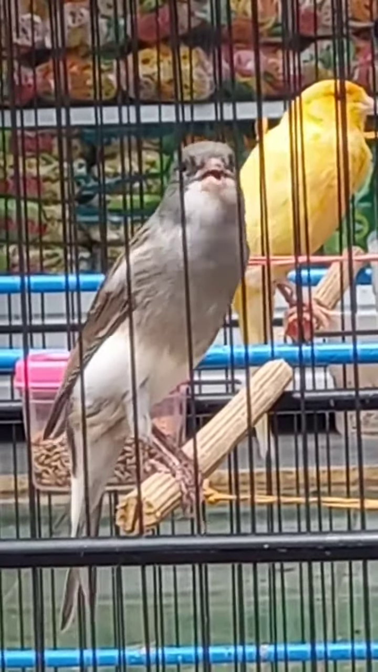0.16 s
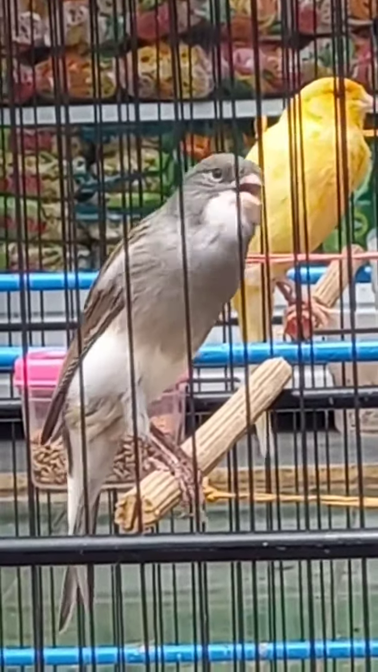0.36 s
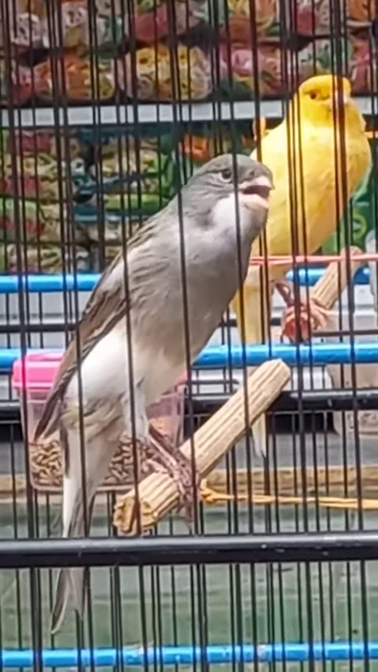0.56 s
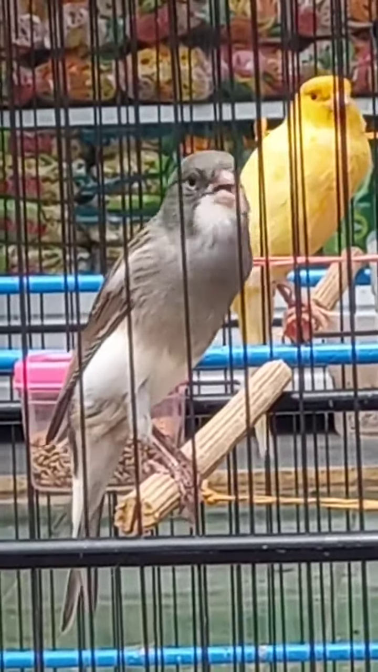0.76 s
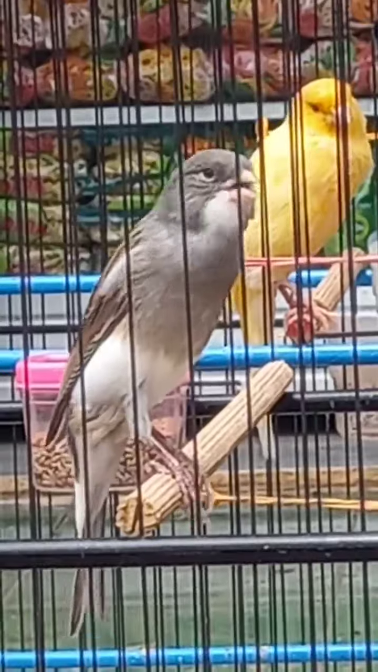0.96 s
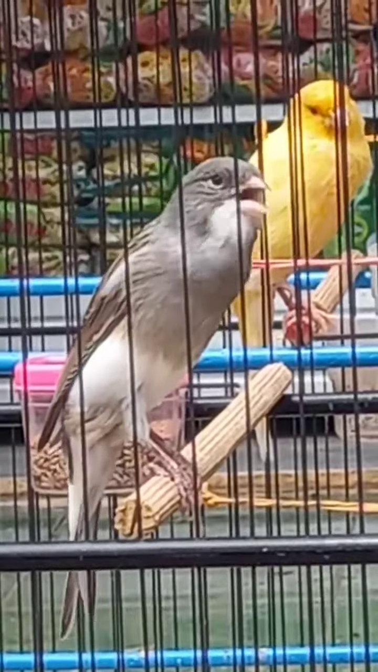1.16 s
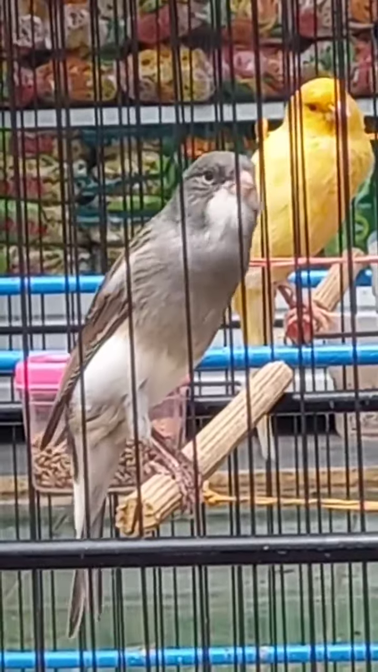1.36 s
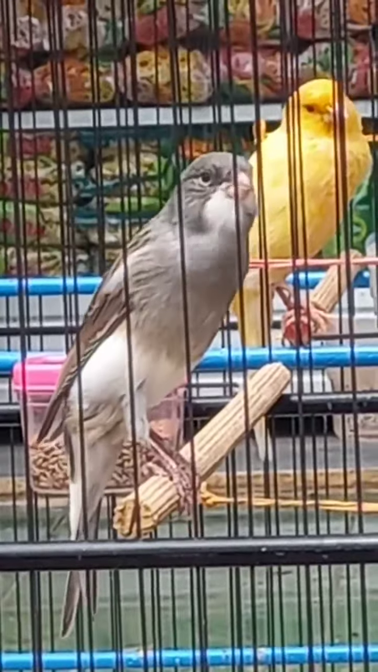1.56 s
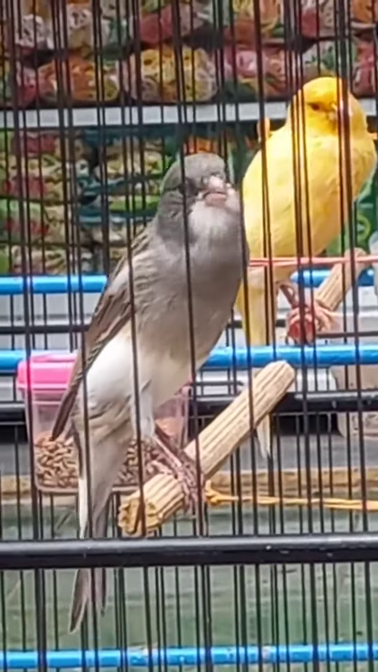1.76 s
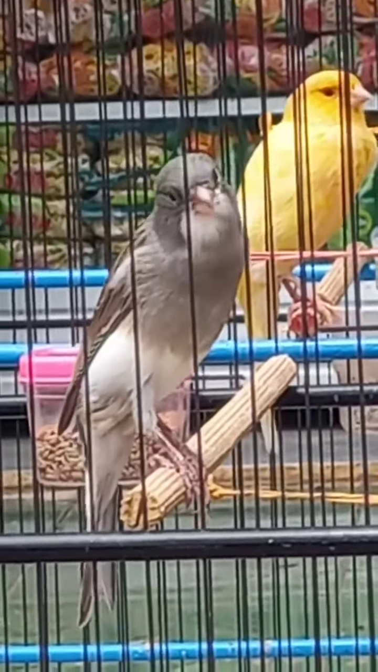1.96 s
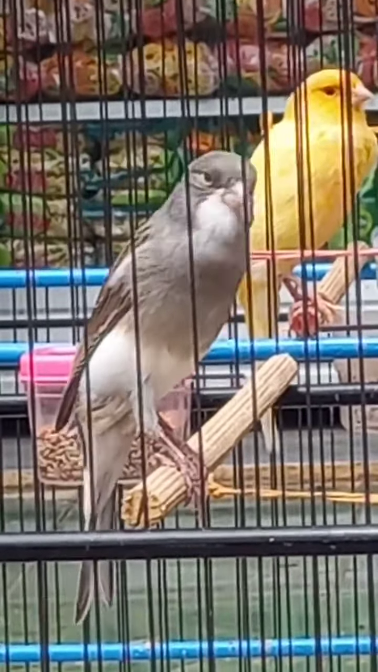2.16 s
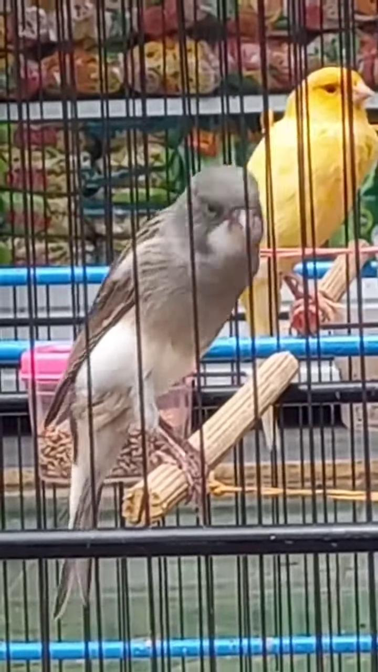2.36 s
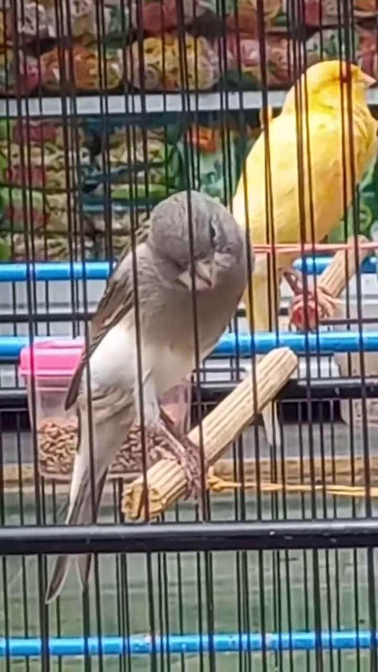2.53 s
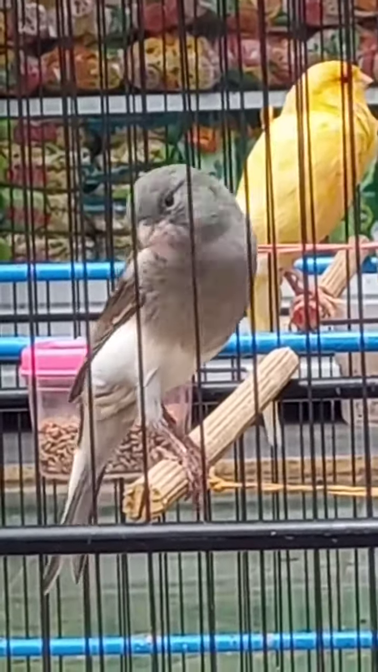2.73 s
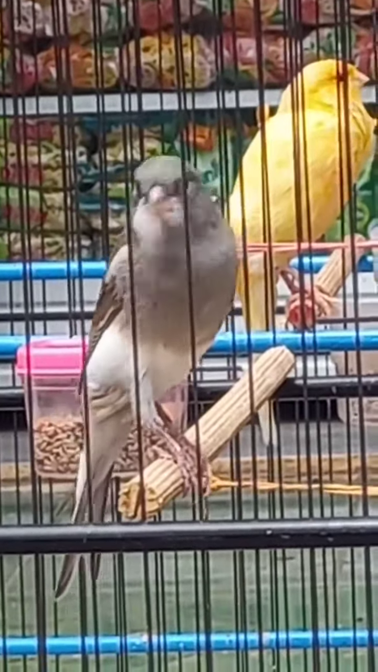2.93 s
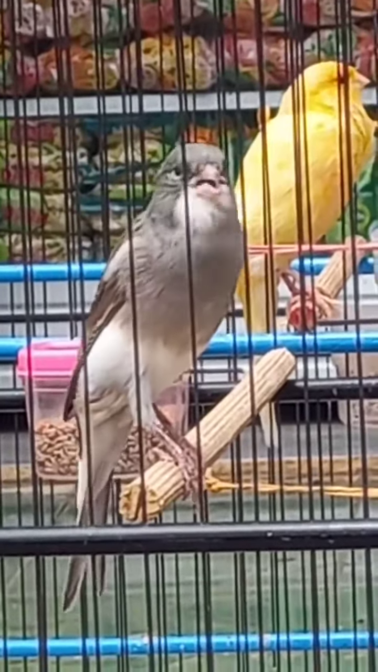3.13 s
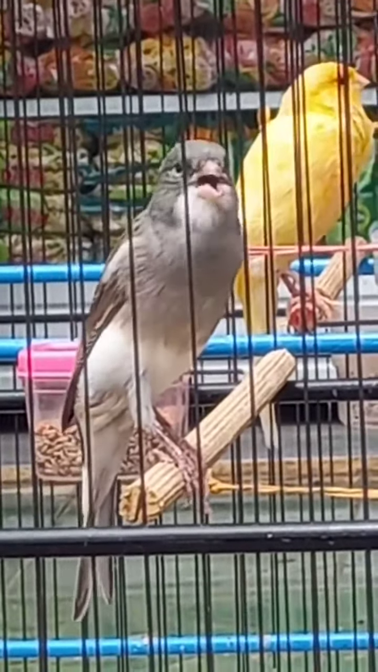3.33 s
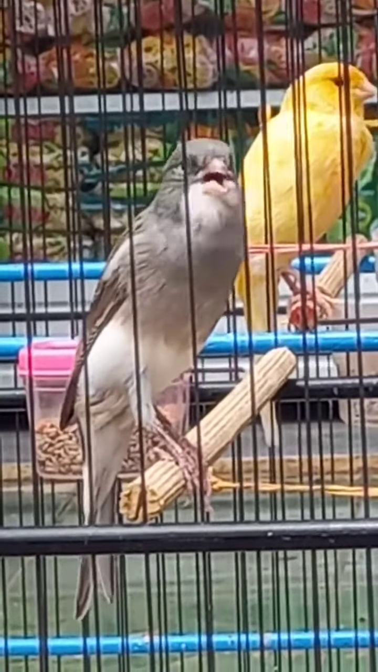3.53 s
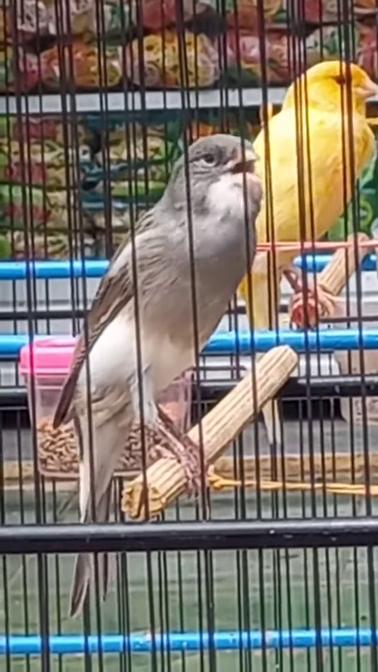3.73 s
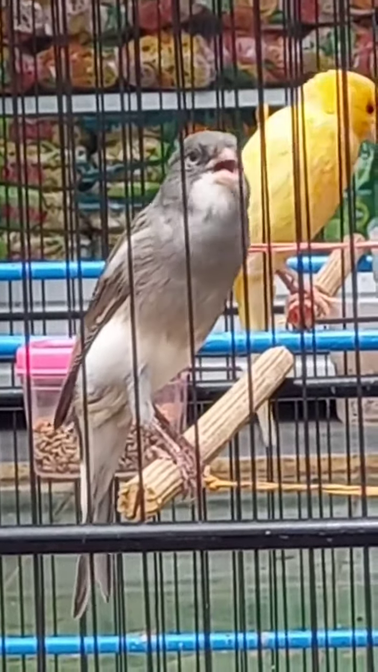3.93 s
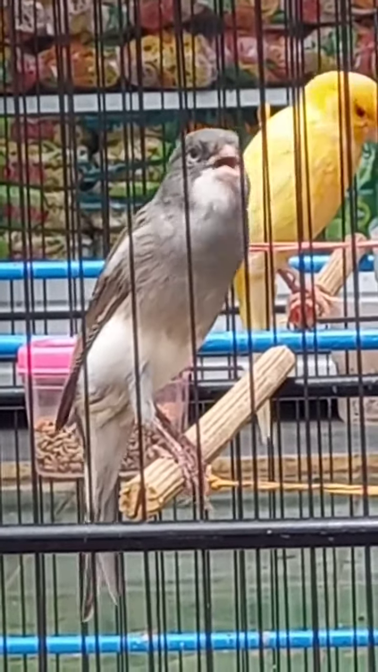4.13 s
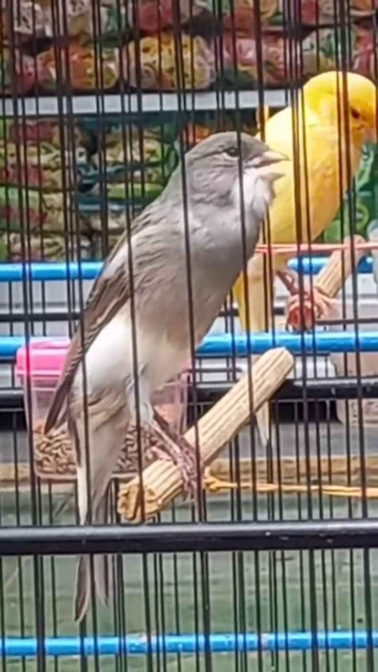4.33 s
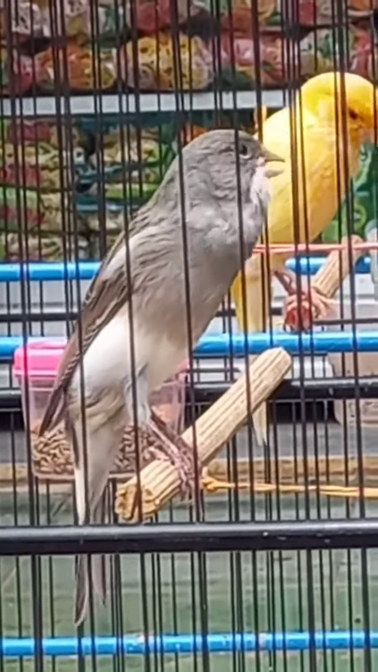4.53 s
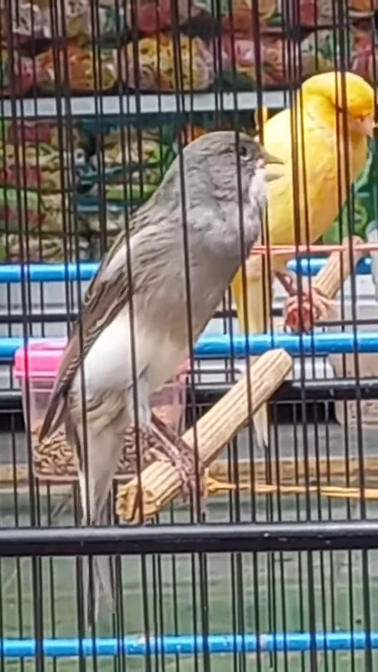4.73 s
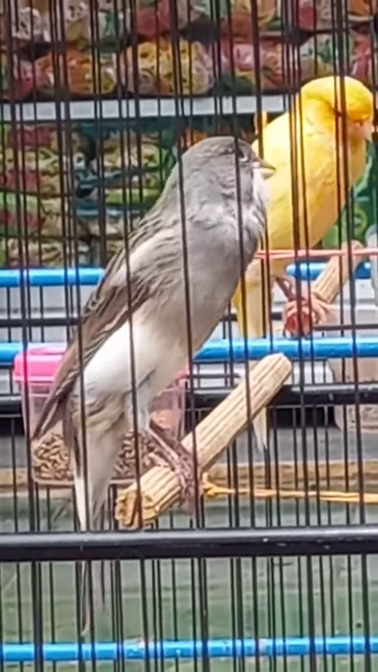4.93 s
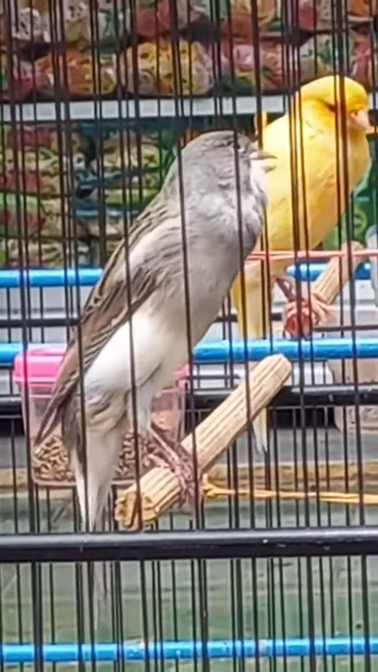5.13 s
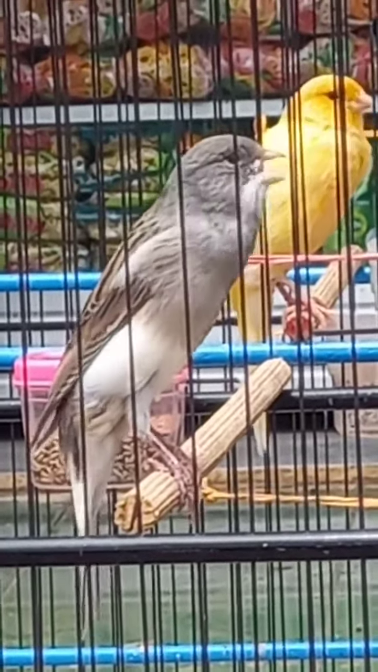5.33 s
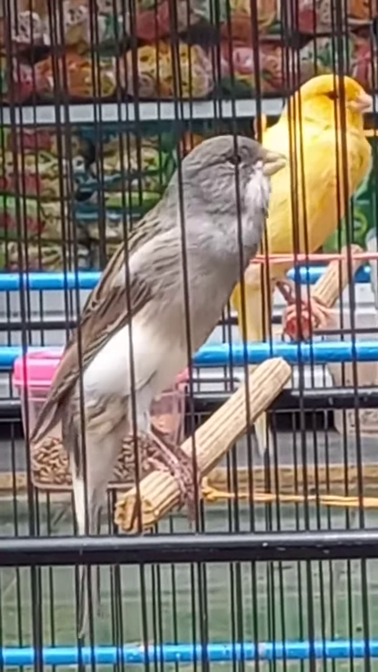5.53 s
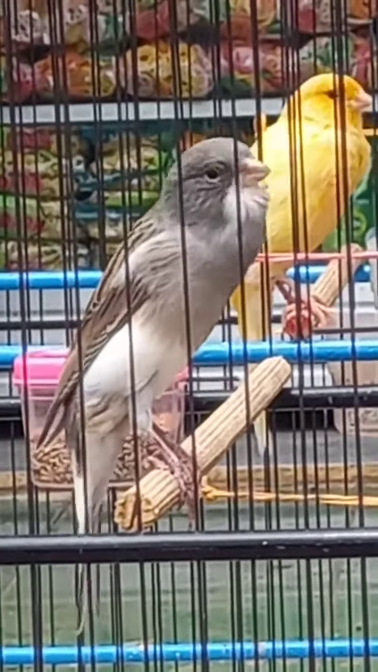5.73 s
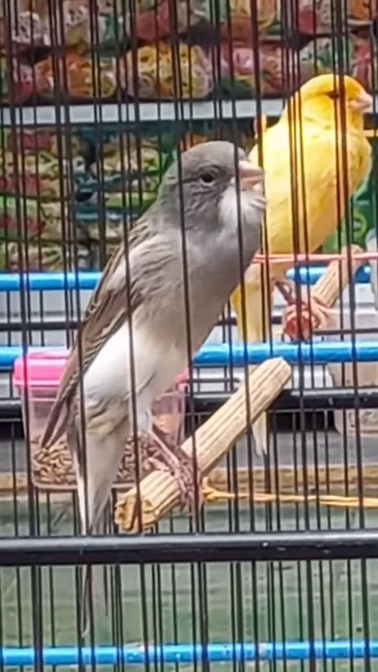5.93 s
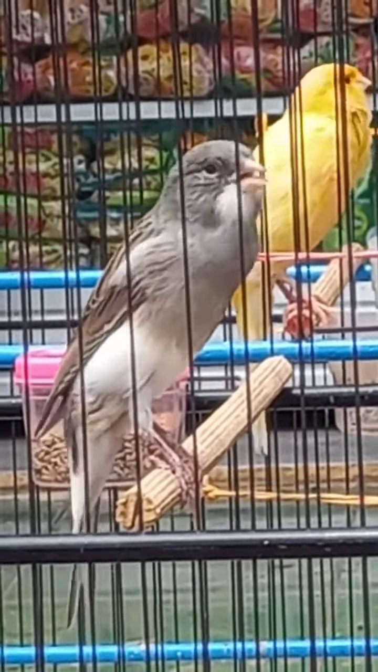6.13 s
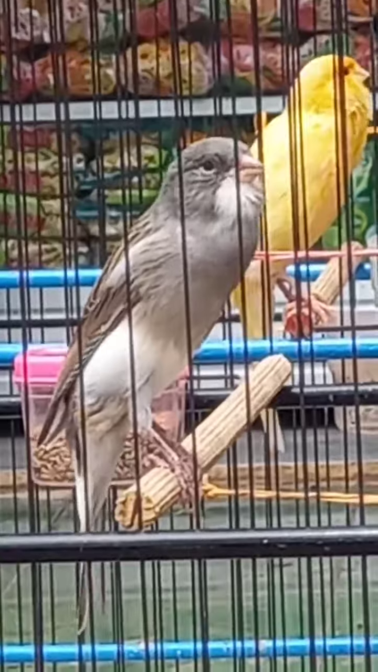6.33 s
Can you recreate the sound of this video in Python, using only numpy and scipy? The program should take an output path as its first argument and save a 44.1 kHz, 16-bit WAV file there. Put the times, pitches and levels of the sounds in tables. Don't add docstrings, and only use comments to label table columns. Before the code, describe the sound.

Many canaries sing together in an indoor bird shop. A very close bird fires loud, evenly spaced downward chirps, with slower falling whistles from a second bird between them. A softer lull of chips and low rolls follows, then brisk falling notes, steep rapid trills and a tangle of rising whistles. Distant twittering and a faint low hum continue throughout, picked up closely by a phone.

```python
import sys
import numpy as np
from scipy import signal
from scipy.fft import rfft, irfft
from scipy.io import wavfile
from scipy.ndimage import uniform_filter1d

SR = 44100
rng = np.random.default_rng(int(sys.argv[2]) if len(sys.argv) > 2 else 0)


def gain_from_decibels(decibels):
    exponent = np.asarray(decibels, float) / 20
    return 10 ** exponent


def waveform_to_disk(signal):
    frames = np.transpose(np.atleast_2d(signal))
    scaled = np.clip(frames, -1, 1) * 32767
    samples = np.round(scaled).astype(np.int16)
    wavfile.write(sys.argv[1], SR, samples)


N = 281358

# start_s, length_s, level_db, fade_db
NEAR_FALLS = [(-.058, 0.086, -21, 5.5), (0.084, 0.081, -21.5, 6.5), (0.209, 0.099, -21.5, 3),
              (0.347, 0.079, -21, 4.5), (0.476, 0.073, -20.5, 4.5), (0.603, 0.071, -18, 0),
              (0.734, 0.073, -22, -5), (0.869, 0.08, -21, 3.5), (1.014, .083, -24.5, 6),
              (1.147, 0.09, -25, 7.5), (1.291, 0.09, -23, 7.5), (1.439, 0.099, -22.5, 5.5)]
# start_s, length_s, pitch_hz, level_db, fade_db
SLOW_FALLS = [
    (0.151, 0.16, 5250, -25, -8),
    (0.417, 0.15, 6140, -23, -7),
    (0.7, 0.18, 6930, -22.5, -7.5),
    (0.982, 0.17, 6650, -22.5, -5.5),
    (1.915, 0.21, 6910, -28.5, -6.5),
    (2.157, 0.2, 6900, -30, -16),
    (2.463, 0.16, 4940, -27.5, -7.5),
]
# start_s, length_s, pitch_hz, level_db, fade_db
BRISK_FALLS = [
    (2.392, 0.064, 6900, -37.5, 13.5),
    (2.524, 0.085, 5930, -26.5, 3),
    (2.673, 0.084, 6250, -24.5, -2),
    (2.748, 0.065, 4340, -29, -3.5),
    (2.835, 0.11, 6640, -26, -2),
    (3.015, 0.1, 6900, -27.5, -2.5),
    (3.223, 0.078, 5570, -27.5, -1.5),
    (3.381, 0.089, 6760, -25.5, -1.5),
    (3.614, 0.12, 7080, -26, 6),
    (3.91, 0.12, 5630, -28, 7.5),
]
# start_s, level_db, fade_db
HIGH_TRILL = [
    (3.119, -29.5, 8),
    (3.228, -27, -2.5),
    (3.331, -30, 5),
    (3.424, -27, -6),
    (3.523, -24.5, -4),
    (3.63, -25.5, 1),
    (3.73, -24.5, -4.5),
]
DEEP_TRILL = [
    (3.829, -31.5, 18),
    (3.936, -28.5, 5.5),
    (4.03, -27.5, 1),
    (4.131, -29.5, -4.5),
    (4.227, -26.5, -7),
    (4.324, -26, -2),
    (4.42, -25.5, -8.5),
    (4.518, -32.5, -3.5),
    (4.622, -30, 6),
    (4.724, -37, 11.5),
]
FAST_TRILL = [
    (4.832, -31.5, 11.5),
    (4.908, -31, 9),
    (4.985, -30.5, 8.5),
    (5.061, -31.5, 7),
    (5.132, -29.5, 7),
    (5.205, -30.5, 1),
    (5.286, -30, 14.5),
    (5.359, -28, 6.5),
    (5.434, -32, -6),
]
# start_s, length_s, start_hz, end_hz, level_db
RISES = [(1.384, .17, 2690, 3676, -32.5), (1.663, 0.21, 2397, 3596, -32.5),
         (4.354, 0.14, 4380, 4600, -35.5), (4.6, 0.04, 3410, 4030, -33.5),
         (4.655, 0.036, 4090, 4006, -35.5), (4.675, 0.092, 3900, 4910, -29),
         (4.908, .13, 2960, 4955, -28.5), (5.161, 0.073, 2880, 4790, -27.5),
         (5.334, 0.063, 3230, 5810, -33), (5.468, 0.13, 3994, 3330, -33), (5.494, 0.083, 3560, 6700, -39),
         (5.636, 0.092, 3680, 6280, -39), (5.635, 0.046, 2890, 4410, -26),
         (5.812, 0.052, 2850, 4840, -27.5), (5.872, .06, 3520, 4880, -35), (6.028, .075, 2613, 3400, -30),
         (6.071, .04, 3090, 4660, -33)]
# start_s, start_hz, level_db
HOOKS = [
    (5.216, 5340, -33),
    (5.439, 4270, -28.5),
    (5.607, 5690, -30),
    (5.863, 6000, -22),
    (6.163, 5990, -30),
    (6.202, 3750, -30),
    (6.31, 3586, -32),
    (6.335, 2474, -20),
]
# start_s, length_s, pitch_hz, level_db
HELD = [(1.09, 0.14, 3772, -28), (4.755, 0.1, 4996, -37), (4.961, 0.053, 3480, -31),
        (5.025, 0.061, 4920, -34.5), (5.251, 0.053, 3440, -31), (5.639, .105, 2640, -37),
        (5.771, 0.057, 2620, -38.5), (5.728, 0.038, 6410, -31.5), (5.894, 0.11, 2641, -34),
        (6.101, 0.135, 3430, -33), (6.226, 0.045, 3400, -39.5), (6.188, 0.14, 2656, -35)]
# start_s, length_s, start_hz, end_hz, level_db
THIN_FALLS = [
    (5.984, 0.053, 6800, 3500, -34),
    (6.155, 0.048, 5000, 3100, -30),
    (4.9, 0.028, 5100, 2300, -31.5),
    (5.7, 0.067, 5600, 2500, -44),
]
# start_s, length_s, level_db
LONG_FALLS = [
    (4.103, .165, -34),
    (4.393, .172, -36.5),
]
# start_s, level_db, fade_db
CHIP_RUN = [
    (1.252, -38, -1),
    (1.365, -35, -10),
    (1.479, -36.5, -12),
    (1.592, -36.5, -6),
    (1.706, -37, -4),
    (1.819, -37.5, -11),
    (1.933, -37.5, -6),
    (2.043, -34.5, -4),
    (2.153, -37, 0),
    (2.272, -40.5, -9),
]
# start_s, length_s, start_hz, end_hz, level_db
FLICKS = [(.001, 0.014, 5590, 4390, -38), (0.597, 0.032, 2500, 6900, -49),
          (1.204, 0.052, 3340, 3210, -41.5), (1.216, 0.025, 3820, 4170, -33.5),
          (2.782, .025, 6210, 2984, -29), (3.17, 0.019, 3740, 2890, -46.5), (4.546, 0.032, 5410, 3790, -36),
          (5.634, 0.037, 3600, 2700, -46), (5.85, 0.0085, 5800, 4830, -41.5),
          (5.903, 0.02, 3495, 2655, -43.5), (6.233, 0.014, 5560, 6780, -39),
          (6.342, 0.021, 5250, 7030, -37)]
# start_s, stop_s, rate_hz, start_hz, end_hz, level_db
ROLLS = [
    (0.716, 1.62, 20, 2300, 1330, -64),
    (1.642, 1.72, 24.2, 2500, 1310, -63),
    (1.728, 2.3, 24.2, 2500, 1265, -57.5),
    (2.448, 3.75, 26, 2600, 1366, -67),
    (3.77, 4.92, 20.5, 2763, 1343, -60.5),
    (5.569, 6.36, 13.3, 2080, 1218, -80),
]
# start_s, length_s, level_db
PIPES = [
    (2.74, 0.14, -47.5),
    (2.96, 0.2, -49.5),
    (3.22, 0.14, -45.5),
    (3.51, 0.12, -43),
]
# start_s, length_s, pitch_hz, level_db
COOS = [
    (.86, 0.13, 169, -70.5),
    (1.02, 0.17, 261, -67),
    (1.36, 0.23, 165, -70),
    (2.06, 0.21, 175, -73),
    (2.36, 0.21, 171, -71.5),
]
# time_s, jump_db
GLINTS = [(.103, 9.5), (0.236, 10), (.405, 9.5), (0.524, 6.5), (0.515, 3), (0.643, -4), (0.777, -2),
          (0.912, 4.5), (1.057, 7.5), (1.193, 11.5), (1.339, 9.5), (1.493, 4), (2.002, 7.5), (2.243, 8.5),
          (2.409, 14), (2.495, 10), (2.796, -2.5), (2.906, -2), (3.135, 9), (3.251, 3), (3.338, 1.5),
          (3.376, 14), (3.432, 6), (3.473, 4), (3.544, 6), (3.715, 11), (3.838, 4), (4.063, 4), (4.162, 7),
          (4.259, 2.5), (4.355, 4), (4.452, 2), (4.466, 4), (4.507, 9), (4.908, 4.5), (4.987, 4),
          (5.165, 1), (5.67, 8), (5.828, 6), (5.843, 0.5), (6.316, 8)]

# pitch_hz, left_db, right_db
NEAR_THROAT = [(2250, -8, -10), (2550, -19, -16), (2950, -1, 3), (4300, -1, 2), (4600, -13, -16),
               (5400, -2, -7), (6300, -7, -7), (7100, -11, -16)]
SLOW_THROAT = [(2300, -17, -16.5), (3390, -5, -4), (4050, -2.5, -0.5), (4250, -12, -6.5),
               (4900, -5.5, -3.5), (6900, -13, -18)]
BRISK_THROAT = [(2100, -9, -14.5), (2700, -12, -4), (3470, -7, -4), (3900, -5.5, 1.5), (4660, -0.5, -2),
                (5800, -4, -7), (5700, -9.5, -12.5), (6900, -8, -14)]
HIGH_THROAT = [(3000.0, -2.9, -0.0), (3500.0, -11.5, -5.3), (4000.0, -19.3, -13.2), (4500.0, -11.1, -13.3),
               (5000.0, 0.1, -7.8), (5500.0, 5.5, -2.2), (6000.0, 0.4, -0.1), (6500.0, -1.7, 0.4),
               (7000.0, -3.9, -4.3)]
DEEP_THROAT = [(1500.0, -37.1, -27.5), (2050.0, -21.2, -19.2), (2600.0, -10.4, -14.7),
               (3150.0, -12.6, -9.4), (3700.0, -3.0, -0.8), (4250.0, 2.1, 5.2), (4800.0, -2.1, -5.4),
               (5350.0, -4.7, -11.2), (5900.0, -2.0, -4.5), (6450.0, 0.6, 0.5), (7000.0, -7.4, -7.8)]
FAST_THROAT = [(2500.0, -12.1, -13.2), (3000.0, -1.0, 1.8), (3500.0, 0.1, 5.6), (4000.0, -8.1, -5.3),
               (4500.0, -15.6, -15.5), (5000.0, -8.6, -10.6), (5500.0, -3.9, -7.3), (6000.0, -2.0, -0.9),
               (6500.0, -7.1, -5.5), (7000.0, -14.2, -13.9)]
RISE_THROAT = [(2500, -5, -11.5), (3000, -4, -5), (3600, -0.5, 3), (4740, 1.5, 2), (6600, -5, 3)]
ROLL_THROAT = [(1260, -11.5, -2), (2600, 8.5, 7.5), (3310, 8, 9), (4000, 7.5, 7.5), (4600, 0, -5)]
OPEN_THROAT = [(2000, 0, 0), (7000, 0, 0)]

# time_s, level_db
CHORUS_SWELL = [(0, -35), (.19, -34), (.87, -43), (1.35, -35.5), (1.79, -41.5), (1.95, -37.5),
                (2.35, -39.5), (3.05, -38), (4.07, -34), (4.57, -34), (5.03, -35.5), (5.33, -33),
                (5.76, -40), (6.38, -36.5)]
# frequency_hz, density_db (per Hz)
CHORUS_SPECTRUM = [(650, -81), (1100, -30), (1900, -4.5), (2350, -2), (2980, -2.5), (4000, -4),
                   (5050, -5.5), (6510, -7.5), (6830, -10), (7400, -8.5), (9620, -68.5), (16300, -120)]
# frequency_hz, density_db (per Hz)
HUM_SPECTRUM = [(15, -50.5), (25, -28.5), (56, -3), (76, 5), (93, 1), (120, -11), (178, -18), (226, -23),
                (269, -21), (369, -24.5), (491, -23.5), (673, -28), (1100, -32.5), (1500, -31.5),
                (2300, -24), (3200, -66.5)]
# time_s, level_db
HUM_SWELL = [(0.0, -69.5), (0.16, -60.5), (0.21, -68), (2.45, -64), (2.9, -55), (3.11, -65), (3.84, -65),
             (3.92, -54.5), (4.18, -63), (6.06, -63.5), (6.15, -75), (6.38, -59)]
# frequency_hz, level_db
TOP_FILL = [(8800, -87.5), (9150, -51.5), (9450, -39), (10200, -31), (11200, -30), (12500, -27),
            (14200, -16.5), (14900, -50)]
# frequency_hz, margin_db
SPARE = [(150, 11), (600, 7), (1050, 1.5), (1400, 4), (2000, 6), (2800, 9.5), (4400, 7), (6000, 7.5),
         (6900, 4), (7200, 0)]
# time_s, length_s
BLANKS = [
    (.66, .055),
    (2.035, .022),
    (4.25, .035),
    (4.17, .015),
]
# frequency_hz, level_db
BLANK_BAND = [(140, -60), (190, 0), (1500, 0), (1900, -60)]

# length_s, start_hz, end_hz
HIGH_NOTE, DEEP_NOTE, FAST_NOTE = (.056, 7050, 2880), (.068, 7050, 1660), (.043, 7000, 2530)
NEAR_FROM_HZ, NEAR_TO_HZ = 7050, 2180
FALL_BEND, RISE_BEND = (1.15, 0), (1.0, 6.5)
# echoes_db, tail_db
CLOSE, MIDDLE = (-8.5, -6), (-2.5, -0.5)


def colour(x, points):
    hz, db = np.transpose(points)
    bins = np.fft.rfftfreq(x.shape[-1], 1 / SR) + 1
    gain = gain_from_decibels(np.interp(np.log(bins), np.log(hz), db))
    return irfft(rfft(x) * gain, x.shape[-1])


def curve(rows):
    return np.interp(np.arange(N) / SR, *np.transpose(rows))


def walk(rate_hz):
    k = int(SR / rate_hz)
    steps = np.repeat(rng.standard_normal(N // k + 1), k)
    return 1.793 * uniform_filter1d(uniform_filter1d(steps, k), k)[:N]


def glints():
    t, db = np.arange(N) / SR, np.zeros(N)
    for s, jump_db in GLINTS:
        at = slice(max(int((s - .05) * SR), 0), int((s + .08) * SR))
        late = t[at] - s
        fade = np.exp(-abs(late) / 0.0089)
        hush = -0.45 * np.exp(-abs(late) / 0.005)
        db[at] += jump_db * np.where(late > 0, fade, hush)
    return uniform_filter1d(db, size=60)


def sing(notes, throat, bend, edge_s=0.00046, flutter_db=2.8, waver=0.0056, accented=1):
    out = np.zeros((2, N))
    flutter = flutter_db * np.array([walk(240), walk(240)])
    drift = 1 + waver * walk(120)
    if accented:
        flutter = flutter + glints()
    throat_hz, *ports_db = np.transpose(throat)
    for s, length, start_hz, end_hz, first_db, second_db in notes:
        at = int(s * SR) + np.arange(int(length * SR))
        u = np.arange(len(at)) / len(at)
        inside = (at >= 0) & (at < N)
        u, at = u[inside], at[inside]
        glide = (1 - u) ** (bend[0] + bend[1] * length)
        hz = (end_hz + (start_hz - end_hz) * glide) * drift[at]
        throat_db = [1.3 * np.interp(hz, throat_hz, port_db) for port_db in ports_db]
        db = np.interp(u, [1 / 4, 3 / 4], [first_db, second_db]) + throat_db
        to_edge_s = np.minimum(np.minimum(u, 1 - u) * length, at / SR)
        edges = np.clip(to_edge_s / edge_s, 0, 1)
        out[:, at] += gain_from_decibels(db + flutter[:, at]) * edges * np.sin(2 * np.pi * np.cumsum(hz) / SR)
    return out


def hall(x, gain_db, pan_db, lag_s, early_db, wet_db, t60=0.29):
    t = np.arange(int(.7 * SR)) / SR
    hits = rng.random((2, len(t))) < .02
    early = rng.standard_normal((2, len(t))) * hits * np.exp(-t / 0.029)
    tail = rng.standard_normal((2, len(t))) * gain_from_decibels(-60 * t / t60) * (1 - np.exp(-t / 0.0018))
    response = sum(gain_from_decibels(db) * r / np.sqrt(np.sum(r ** 2) / 2) for r, db in ((early, early_db), (tail, wet_db)))
    wet = signal.fftconvolve(np.mean(x, axis=0)[None], response, axes=1)[:, :N]
    left = np.roll(x[0], int(lag_s * SR)) * gain_from_decibels(pan_db / 2)
    right = x[1] * gain_from_decibels(-pan_db / 2)
    return gain_from_decibels(gain_db) * (np.array([left, right]) + wet)


def note(s, length, start_hz, end_hz, db, fade_db=0):
    return s, length, start_hz, end_hz, db + fade_db / 2, db - fade_db / 2


def trill(rows, syllable):
    return [note(s, *syllable, db, fade_db) for s, db, fade_db in rows]


def near_notes():
    return [note(s, length, NEAR_FROM_HZ, NEAR_TO_HZ, db, fade_db) for s, length, db, fade_db in NEAR_FALLS]


def near_bird():
    return hall(sing(near_notes(), NEAR_THROAT, FALL_BEND, edge_s=0.0013), 1.88, 0, -.00005, *CLOSE)


def second_bird():
    slow = [note(s, length, hz, 2100, db, fade_db) for s, length, hz, db, fade_db in SLOW_FALLS]
    brisk = [note(s, length, hz, 2760, db, fade_db) for s, length, hz, db, fade_db in BRISK_FALLS]
    song = sing(brisk, BRISK_THROAT, (1.2, 0))
    song = song + sing(slow, SLOW_THROAT, (1.65, 0), edge_s=0.007, flutter_db=3.0, waver=.007)
    return hall(song, 1.98, 0, .0003, *MIDDLE)


def grey_bird():
    trills = ((HIGH_TRILL, HIGH_NOTE, HIGH_THROAT, (1.02, 0)),
              (DEEP_TRILL, DEEP_NOTE, DEEP_THROAT, FALL_BEND),
              (FAST_TRILL, FAST_NOTE, FAST_THROAT, (1.45, 0)))
    song = sum(sing(trill(rows, syllable), throat, bend, edge_s=.002, flutter_db=4)
               for rows, syllable, throat, bend in trills)
    return hall(song, 4.2, 0, 0.0003, *CLOSE)


def rising_whistles():
    notes = [note(*row, 3.5) for row in RISES]
    notes += [note(s, 0.018, hz, hz + 710, db, 3.5) for s, hz, db in HOOKS]
    arcs = [row for row in notes if row[1] > .11]
    quick = [row for row in notes if row[1] <= .11]
    song = sing(arcs, RISE_THROAT, RISE_BEND, edge_s=0.008, flutter_db=2.2, waver=.004)
    song = song + sing(quick, RISE_THROAT, RISE_BEND, edge_s=0.0045, flutter_db=4, waver=.008)
    return hall(song, -.2, -1.9, -.00005, -6.5, -2.5)


def clean_whistles():
    held = [note(s, length, hz, hz - 68.3, db, -1) for s, length, hz, db in HELD]
    thin = [note(*row) for row in THIN_FALLS]
    song = sing(held, OPEN_THROAT, RISE_BEND, edge_s=0.012, flutter_db=0.9, waver=0.003)
    song = song + sing(thin, OPEN_THROAT, FALL_BEND, edge_s=.004, flutter_db=3.5, waver=0.0026)
    return hall(song, 0.13, 0.93, -.00003, -11.5, -3.5)


def long_falls():
    notes = [note(s, length, 6850, 2880, db, -9) for s, length, db in LONG_FALLS]
    return hall(sing(notes, OPEN_THROAT, (.86, 0), edge_s=0.0044, flutter_db=4.5), 1.5, 0, .00003, *MIDDLE)


def chips():
    notes = trill(CHIP_RUN, (.046, 6800, 4350))
    for s in np.arange(1.666, 2.27, .0413):
        notes.append(note(s, .009, 3000, 4250, -35.5))
        notes.append(note(s + .011, .008, 4600, 6300, -41))
    lead_s = 0.0077
    notes += [note(s - lead_s, lead_s, 4633, NEAR_FROM_HZ, db - 19.5, -14.5) for s, _, db, _ in NEAR_FALLS[1:]]
    notes += [note(*row) for row in FLICKS]
    return hall(sing(notes, OPEN_THROAT, FALL_BEND, edge_s=0.001, flutter_db=3.5), 1.9, 3.5, .0001, -2.5, -2.5)


def rolls():
    notes = [(s, .45 / rate, start_hz, end_hz, db + 5.5, db + 2 * rng.standard_normal())
             for a, b, rate, start_hz, end_hz, db in ROLLS for s in np.arange(a, b, 1 / rate)]
    notes += [(s + length, .012, end_hz, 1250, db - 26, db - 42.0)
              for s, length, _, end_hz, _, db in near_notes()]
    notes += [note(s + length, .014, end_hz, 1857, db - 31, 14)
              for s, length, _, end_hz, _, db in trill(FAST_TRILL, FAST_NOTE)]
    song = sing(notes, ROLL_THROAT, (2.8, 0), edge_s=0.0031, flutter_db=5.5, accented=0)
    return hall(song, 0, 2.3, 0.0001, -6.0, 7.2)


def pipes():
    notes = [note(s, length, 2347, 2347, db) for s, length, db in PIPES]
    song = sing(notes, OPEN_THROAT, FALL_BEND, edge_s=0.034, flutter_db=1.5, waver=.012, accented=0)
    return hall(song, 0, -1.5, 0, *MIDDLE)


def coos():
    notes = [note(s, length, hz, 1.09 * hz, db, 4.5) for s, length, hz, db in COOS]
    return hall(sing(notes, OPEN_THROAT, RISE_BEND, edge_s=0.024, waver=0.011, accented=0), 0, .6, 0, *CLOSE)


def chorus(count=600):
    when, height, drop, length, level = rng.random((count, 5)).T
    start_s = when * N / SR
    lowest_hz = np.where(start_s < 4.8, 1950, 2300)
    end_hz = lowest_hz * (1 - height) + 6150 * height
    start_hz = np.minimum(end_hz + 600 + 2400 * drop, 7300)
    notes = np.transpose([start_s, 0.01 + 0.027 * length, start_hz, end_hz, 4 * level, 4 * level])
    far = hall(sing(notes, OPEN_THROAT, FALL_BEND, edge_s=0.0014, accented=0), 0, -.5, 0, 6.0, 12.0)
    far = np.concatenate([far[:, -SR // 2:], far[:, SR // 2:]], axis=1)
    far = colour(far, CHORUS_SPECTRUM)
    return far / np.std(far) * gain_from_decibels(curve(CHORUS_SWELL) + 3.0)


def hum():
    mid, side = rng.standard_normal((2, N))
    side = colour(side, [(60, -12.0), (250, -4.5), (900, -2.5)])
    low = colour(np.array([mid + side, mid - side]), HUM_SPECTRUM) * gain_from_decibels([[1.1], [-1.1]])
    swell = gain_from_decibels(curve(HUM_SWELL))
    bass = colour(low, [(130, -2.0), (200, -21.0)])
    return (bass * swell + (low - bass) * np.mean(swell)) / np.std(bass)


def scene():
    birds = (near_bird() + second_bird() + grey_bird() + rising_whistles() + clean_whistles()
             + long_falls() + chips() + rolls() + pipes())
    birds = signal.sosfilt(signal.butter(8, 1100, "high", fs=SR, output="sos"), birds)
    return birds + coos() + chorus() + hum()


def starve(x, size=4096, count=10):
    hz, _, z = signal.stft(x, SR, "cosine", size)
    used = 720 // count * count
    power = np.mean(abs(z[:, :used]) ** 2, axis=0).reshape(-1, count, z.shape[2]).mean(axis=1)
    band_db = 10 * np.log10(power + 1e-18)
    song_db = 10 * np.log10(np.mean(abs(z) ** 2, axis=(0, 1)) + 1e-18)
    song_rise_db = song_db - uniform_filter1d(song_db, size=9)
    usual_db = uniform_filter1d(band_db, size=9, axis=1) + .4 * song_rise_db
    spare_db = np.interp(hz[count // 2:used:count], *np.transpose(SPARE))[:, None]
    luck = uniform_filter1d(rng.standard_normal(band_db.shape), size=2, axis=1) * np.sqrt(2)
    kept = band_db > usual_db - spare_db + 3 * luck
    z[:, :used] *= np.repeat(kept, count, axis=0)
    t = np.arange(N) / SR
    blank = sum(np.clip(3 - abs(t - s) * 5 / length, 0, 1) for s, length in BLANKS)
    return signal.istft(z, SR, "cosine", size)[1][:, :N] - blank * colour(x, BLANK_BAND)


def low_pass(x):
    return signal.sosfilt(signal.butter(12, 15750, fs=SR, output="sos"), x)


def record(dry):
    t = np.arange(N) / SR
    kept = signal.sosfilt(signal.cheby1(9, .5, 7150, fs=SR, output="sos"), np.tanh(dry))
    loudness = np.sqrt(uniform_filter1d(kept ** 2, size=800, axis=1) + 1e-12)
    blur = colour(rng.standard_normal((2, N)), [(900, 2.5), (2500, -28.0)])
    shift_hz = 7494
    copy = kept * (1 + 0.54 * blur / np.std(blur)) * np.cos(2 * np.pi * shift_hz * t)
    grain = colour(loudness * rng.standard_normal((2, N)), [(9500, 30.9), (11200, 28.0), (14200, 5.0)])
    top = colour(copy + gain_from_decibels(-20.5) * grain, TOP_FILL) * gain_from_decibels([[-1.2], [1.2]])
    edge_hz = 15750
    edge = gain_from_decibels(-32.0) * np.maximum(loudness - .065, 0) * np.sin(2 * np.pi * edge_hz * t)
    return low_pass(starve(kept) + top + edge)


dry = scene()
out = record(dry)
waveform_to_disk(out)
```